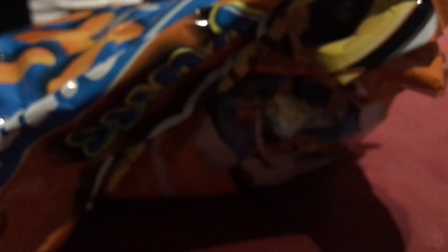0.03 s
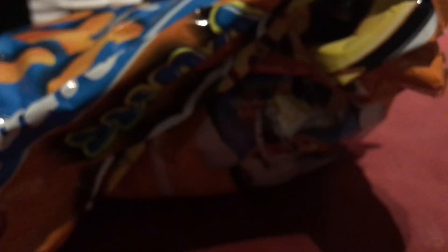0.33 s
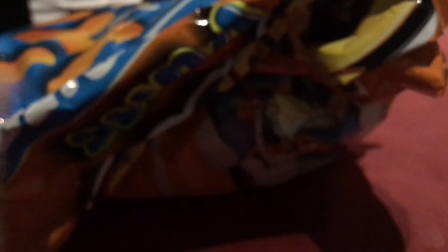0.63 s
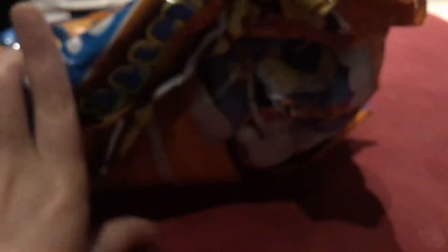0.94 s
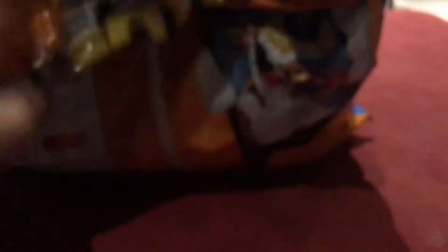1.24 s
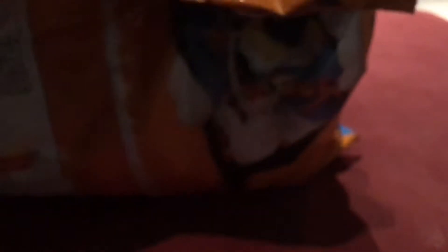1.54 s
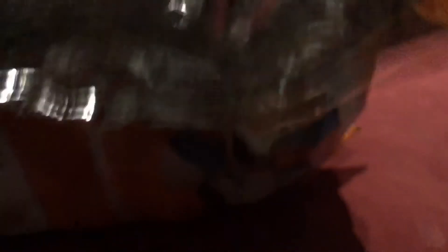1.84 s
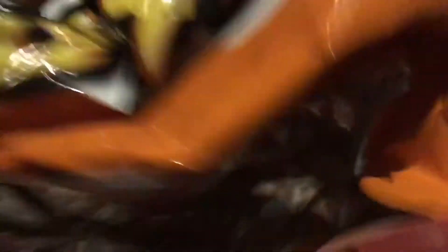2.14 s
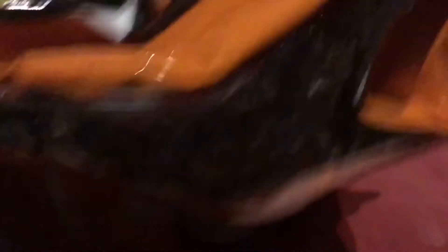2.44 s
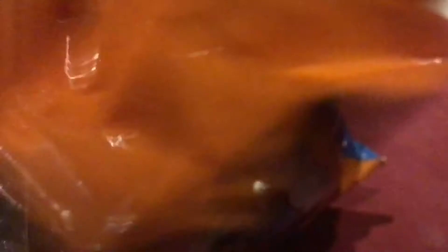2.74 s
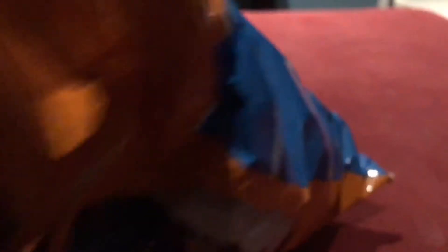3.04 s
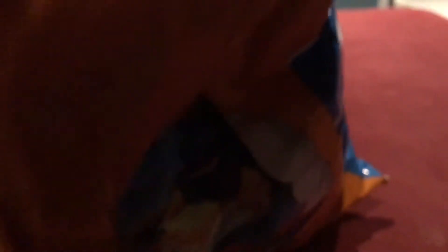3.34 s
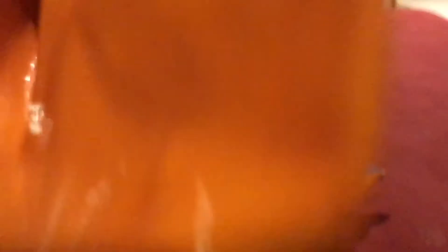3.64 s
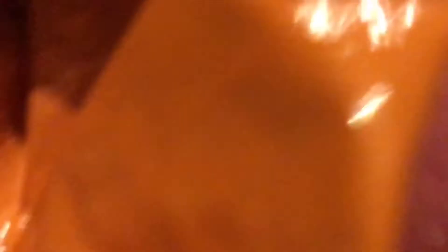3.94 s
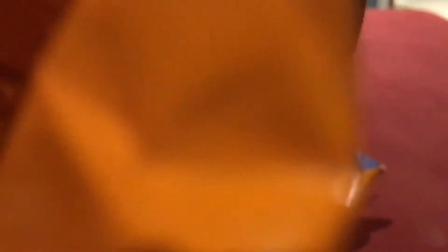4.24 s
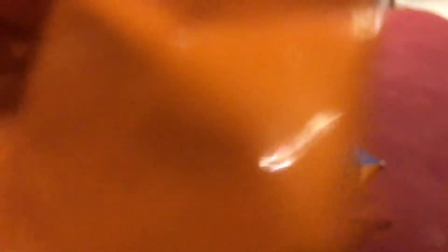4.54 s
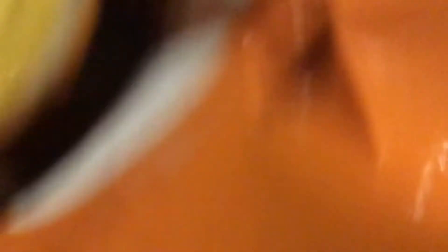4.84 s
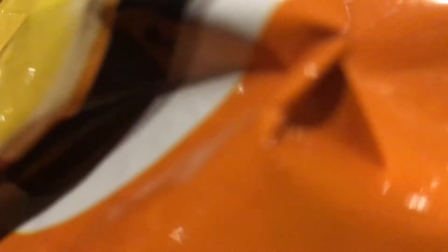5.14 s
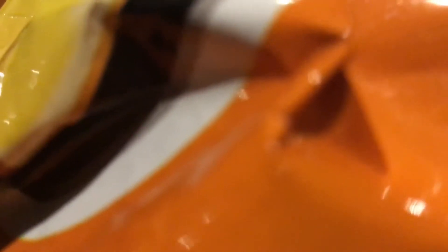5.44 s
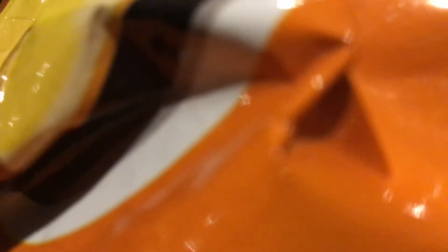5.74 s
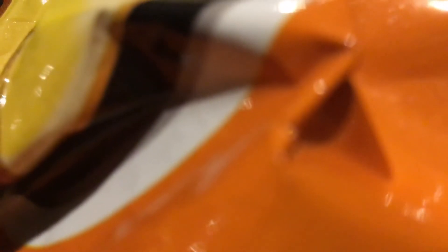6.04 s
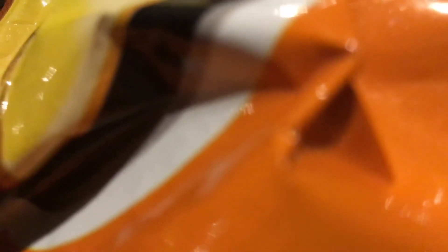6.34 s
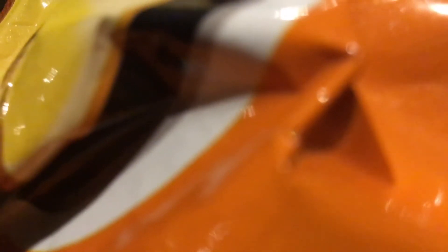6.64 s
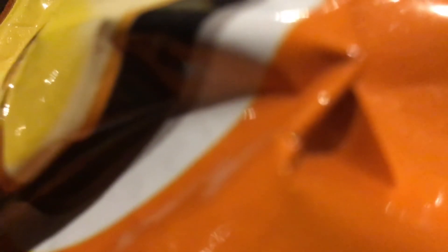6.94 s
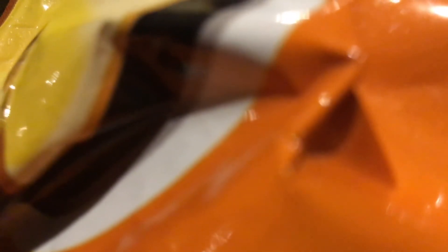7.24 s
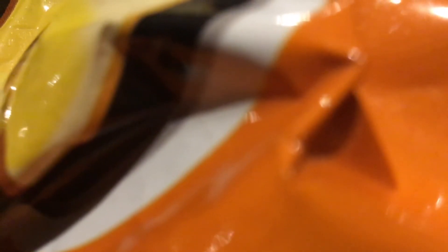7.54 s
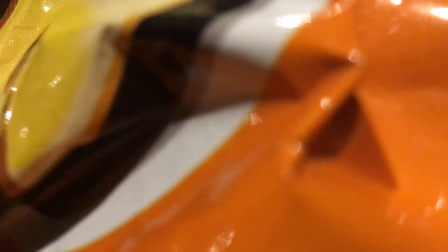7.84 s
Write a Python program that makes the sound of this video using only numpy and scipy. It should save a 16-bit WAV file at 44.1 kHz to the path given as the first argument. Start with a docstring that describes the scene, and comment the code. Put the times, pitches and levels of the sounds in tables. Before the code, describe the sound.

Close, crisp crackling of a plastic snack bag being opened and handled, easing to light rubbing and occasional ticks in a quiet room.

```python
"""A foil snack bag is opened and crumpled on a cloth-covered table, close up in a small quiet room.
After one faint slide of film, the hand takes hold at 0.7 s: creases buckle in sharp snaps over a bed
of tiny crackles, the walls sway, and whole panels flop with soft thumps. From 3.5 s film also drags
over film. Near 5 s the hand comes to rest: the film slides in a few soft strokes and ticks now and
then as it relaxes, over the low hush of the room."""
import sys
import numpy as np
from scipy import signal
from scipy.fft import rfft, irfft
from scipy.io import wavfile
from scipy.ndimage import uniform_filter1d

SR = 44100
rng = np.random.default_rng(int(sys.argv[2]) if len(sys.argv) > 2 else 0)


def to_wav(sig):
    """Store sig (one row per channel, or 1-D mono) as 16-bit WAV at the path in sys.argv[1].

    Samples outside -1..1 are clipped; the rate is SR.
    """
    pcm = np.clip(np.atleast_2d(sig), -1, 1) * 32767
    pcm = np.round(pcm).astype(np.int16)
    wavfile.write(sys.argv[1], SR, pcm.T)  # frames by channels


N = 357210

# The tone of film brushing film. Each row: frequency in Hz, relative level in dB.
RUSTLE_SPECTRUM = [(100, -9.5), (1200, 2), (5500, -5), (11000, -7), (16000, -19.5)]


def snaps(effort, lag_s=.0014, slack_hz=520, busy_db=-40, clean_db=-13, size=2048):
    """Each buckling crease gives a bright crack and a hollow, falling pop from the panel around it."""
    # The big creases. Each row: time in seconds, crack level in dB, nominal crack pitch in Hz,
    # panel level in dB, panel pitch in Hz.
    big_creases = [(0.7173, -46, 5200, -48, 2000), (0.7492, -30.5, 6800, -38, 550),
                   (0.7694, -25, 9200, -21, 2080), (0.8794, -24.5, 6400, -44, 1160),
                   (0.883, -21.5, 10500, -41, 764), (0.9113, -19.5, 8700, -21, 1800),
                   (0.9284, -21, 3220, -15, 2000), (0.95, -20, 4700, -33, 2000),
                   (0.966, -14, 3870, -16.5, 2070), (0.9764, -25, 4500, -40, 1350),
                   (1.026, -15.0, 6360, -19, 1930), (1.1405, -19, 4100, -47, 520),
                   (1.228, -23, 5800, -17.5, 1900), (1.2786, -20.5, 5870, -30, 2000),
                   (1.3491, -23.0, 5000, -26, 1120), (1.3663, -14, 4700, -44.0, 1097),
                   (1.3841, -21, 6600, -24, 2010), (1.419, -24, 3200, -23, 2020),
                   (1.427, -18.5, 5700, -19.5, 1950), (1.462, -17.5, 8400, -21, 2030),
                   (1.4728, -16, 5570, -15.5, 1390), (1.483, -16, 5200, -30.5, 344),
                   (1.518, -29, 4250, -24.5, 1990), (1.5536, -20, 8050, -44, 670),
                   (1.5645, -13, 5540, -32, 475), (1.6314, -14, 5600, -25, 1350),
                   (1.6744, -17.5, 3900, -44, 368), (1.697, -19.5, 7700, -11.5, 2100),
                   (1.7429, -14, 7500, -15, 1560), (1.7524, -14.5, 4200, -33, 1490),
                   (1.7715, -16, 7200, -31, 1730), (1.7974, -10.5, 4630, -21, 1950),
                   (1.8294, -16, 5630, -23.5, 1170), (1.8399, -22, 6200, -25, 1980),
                   (1.8784, -26, 5500, -21.5, 1310), (1.9097, -23.5, 6290, -23.5, 1975),
                   (1.922, -19.5, 4540, -24, 1780), (1.9452, -20.5, 3450, -48.0, 570),
                   (1.9654, -19.5, 6800, -19, 1390), (1.9763, -14, 5460, -30, 755),
                   (2.0072, -16.5, 4420, -27, 586), (2.017, -19.5, 5800, -25.5, 1430),
                   (2.0558, -19, 5040, -18.5, 1900), (2.1129, -13.5, 6000, -21.5, 1150),
                   (2.1784, -20, 4096, -34, 365), (2.1992, -10, 4100, -25, 1400),
                   (2.21, -20, 5330, -15, 1430), (2.2937, -19, 5460, -32, 990),
                   (2.341, -17, 8100, -19.5, 2008), (2.3582, -15.0, 7176, -21, 1980),
                   (2.3764, -15.5, 4700, -31, 530), (2.3931, -18, 4800, -24, 2000),
                   (2.4033, -12, 5000, -22, 870), (2.4833, -16.5, 8110, -21.5, 2000),
                   (2.5, -14.5, 5750, -23, 1550), (2.5537, -10.5, 6200, -27, 594.4),
                   (2.5654, -12, 4770, -13.5, 1370), (2.575, -10, 8900, -21, 1690),
                   (2.623, -17, 4513, -15, 1320), (2.631, -14, 4460, -26, 1250),
                   (2.6402, -13, 5100, -16, 447), (2.6483, -12.5, 3170, -17, 372),
                   (2.6708, -15, 4500, -18, 940), (2.712, -4, 6400, -16, 2044),
                   (2.7312, -13.5, 5970, -10.5, 1992), (2.7747, -10.5, 5377, -19.5, 1075),
                   (2.834, -36, 7900, -12, 1940), (2.8542, -13, 5440, -18, 1090),
                   (2.8881, -18, 5100, -13, 1620), (2.9057, -16.5, 8250, -17, 1360),
                   (2.956, -18, 2977, -52.0, 1080), (3.052, -25, 3794, -25.0, 1010),
                   (3.0657, -46, 10900, -17, 920), (3.0811, -28, 5100, -17, 1670),
                   (3.1113, -18.5, 6100, -20.5, 1360), (3.1257, -18.5, 4800, -24, 1180),
                   (3.1505, -16.5, 3870, -47.0, 1200), (3.1719, -19.5, 3340, -29, 360),
                   (3.1789, -25.5, 8450, -13, 1820), (3.2254, -32, 4910, -21.5, 1330),
                   (3.2777, -46, 3930, -42, 1254), (3.3145, -25.5, 4020, -25, 1020),
                   (3.3376, -17.5, 4970, -23, 1310), (3.376, -18.5, 6490, -13.5, 990),
                   (3.39, -16, 4700, -15.5, 1440), (3.4257, -29, 7100, -43, 1260),
                   (3.448, -15, 6600, -27, 563), (3.4537, -13, 4940, -18, 1080),
                   (3.505, -22, 5000, -31, 775), (3.5219, -14.5, 4870, -30, 1900),
                   (3.5387, -14, 5526, -25, 974), (3.5704, -13.5, 4630, -33, 1300),
                   (3.6054, -18, 5470, -17.5, 1010), (3.628, -21, 4570, -34, 2000),
                   (3.6631, -24.5, 6280, -35, 800), (3.673, -21.5, 3200, -26, 362),
                   (3.6873, -22.5, 4940, -31, 660), (3.7972, -20.5, 4353, -30.5, 516),
                   (3.8157, -27, 4100, -40, 743), (3.8962, -32, 4100, -26.5, 1090),
                   (4.052, -37, 7930, -24, 1270), (4.0667, -26.5, 7590, -23.5, 1966),
                   (4.113, -22, 3900, -32, 378), (4.155, -43, 2410, -27.5, 1270),
                   (4.2127, -20, 4400, -17.5, 722), (4.2721, -19.5, 4295, -17.5, 806),
                   (4.344, -28, 10900, -20, 2000), (4.3502, -16.5, 5470, -15, 1692),
                   (4.3623, -15, 5550, -23.5, 860), (4.3812, -24, 2590, -17.5, 462),
                   (4.4561, -23.5, 3790, -25.5, 1270), (4.4822, -41, 8740, -18.5, 1290),
                   (4.5325, -23.5, 3500, -29.5, 2000), (4.5653, -13.5, 3850, -26, 853),
                   (4.587, -40, 3300, -26.5, 1650), (4.6079, -18.5, 3820, -43, 374),
                   (4.6979, -18.5, 3420, -23.5, 634), (4.742, -17.5, 5730, -28, 1021),
                   (4.7526, -24, 4800, -3.5, 1080), (4.7585, -27, 7000, -30, 1400),
                   (4.787, -6, 11910, -21.5, 1070), (4.7962, -25.5, 8200, -19, 1350),
                   (4.8272, -47, 4200, -27.5, 570), (4.8696, -30.5, 5180, -22, 1200),
                   (4.9028, -58, 3300, -34, 600), (4.9244, -32.5, 4440, -32, 840),
                   (4.934, -39, 6330, -45, 374), (4.9734, -22.5, 6700, -15.5, 529),
                   (4.9826, -31.5, 3100, -20.5, 412), (5.0177, -48, 3300, -36, 510),
                   (5.037, -31.5, 2680, -30.5, 1060), (5.0668, -31.5, 5900, -26.5, 855),
                   (5.0947, -22.5, 7120, -17.5, 923), (5.15, -63.5, 3000, -40, 598),
                   (5.2416, -50, 5000, -35.5, 1150), (5.2544, -43.5, 2400, -26, 367),
                   (5.3214, -22, 3600, -41, 362), (5.3474, -39, 2360, -38.5, 690),
                   (5.4504, -43.5, 5200, -27, 444), (5.5414, -29, 4130, -39, 1890),
                   (5.7818, -24, 5950, -38, 1010), (5.8467, -48, 3700, -26, 440),
                   (5.873, -32, 10820, -42.5, 1560), (6.0481, -71.5, 3900, -43.5, 560),
                   (6.206, -36.5, 4620, -34, 1104), (6.2176, -43.5, 3490, -40.5, 730),
                   (6.2491, -41, 2390, -25.5, 386.4), (6.8842, -28.5, 5300, -43, 1240),
                   (6.944, -42.5, 3500, -23, 557), (6.954, -47, 3600, -25, 439),
                   (6.9854, -42.5, 3200, -27.5, 490), (7.0147, -70, 4800, -36.5, 491),
                   (7.228, -34.5, 3600, -31, 423), (7.3728, -52.0, 2703, -52.5, 1145),
                   (7.6472, -33, 3300, -26, 1500), (7.656, -45.5, 10500, -39, 600)]
    # The tone the film lends every snap. Each row: frequency in Hz, relative level in dB.
    film_spectrum = [(100, 1), (1200, -3.5), (2800, -4), (6000, -2.5), (7700, -3.5), (9500, 1),
                     (11000, 3.5), (11700, -1.5), (12800, 2), (14500, -7), (16000, -3)]
    out, hz, lead_s = np.zeros(N), np.fft.rfftfreq(size, 1 / SR), .006
    film = amp(read(film_spectrum, hz)) * np.exp(-2j * np.pi * hz * lead_s)
    strain = np.clip(effort / amp(busy_db), .4, 1)  # a squeezed crease has stronger side slips
    for s, crack_db, crack_hz, panel_db, panel_hz in list(big_creases) + small_creases(effort):
        busy = strain[int(s * SR)]
        steps = busy * min(amp(clean_db - max(crack_db, panel_db)), 1)  # the biggest go more cleanly
        spread = (2 - busy) * 1000 / panel_hz  # a wide, slack panel draws its wave out longer
        panel_lag_s = lag_s * spread * rng.uniform(.5, 1)
        wave = film * bending_wave(hz, panel_lag_s, scatter_s=0.0004927 * spread, echo=0.65)
        facets = sum(ring(hz, crack_hz * 2 ** rng.uniform(-1, 1), sharpness=15) for _ in range(3))
        crack = hump(hz, crack_hz * 1.105, rise=1.41, fall=3.51) * (1 + 0.9 * facets)
        crack /= np.hypot(1, (hz / (crack_hz * 8 * busy)) ** 4)  # a resting crease has less top end
        crack *= film * bending_wave(hz, lag_s * rng.uniform(.5, 1), scatter_s=.00045, echo=.6)
        crack = irfft(crack * avalanche(hz, spread_s=0.0011, share=0.33 * steps))
        pop = hump(hz, panel_hz * 1.15, rise=0.79, fall=2.03)
        pop = pop * (1 + 0.49 * ring(hz, panel_hz, sharpness=5.5))
        slack = min(slack_hz / panel_hz, 1) ** 2  # the air behind a wide, slack panel rings on, lower
        pop *= 1 + 0.47 * slack * ring(hz, panel_hz * .7, sharpness=7)
        pop *= 1 + .65 * ring(hz, panel_hz * rng.uniform(1.3, 2.4), sharpness=15)  # panel overtone
        pop *= np.exp(-(hz / (9 * panel_hz)) ** 2)  # a whole panel is too heavy for the top end
        pop = irfft(wave * 1j * pop * avalanche(hz, spread_s=0.0022, share=0.42 * steps))
        snap = amp(crack_db) * unit(crack) + amp(panel_db) * unit(pop)
        add(out, s - lead_s, snap * np.sqrt(SR / 1000 / size))  # levels count as rms over 1 ms
    return out


def small_creases(effort, per_s=85, firm_db=-36, spread_db=2.5, spread_octaves=.38):
    """Rows for lesser creases that buckle by chance: denser, louder, brighter as the hand presses."""
    rows = []
    for slot, (when, luck, *chance) in enumerate(rng.random((1000, 6))):
        s = (slot + when) / per_s
        press = effort[int(s * SR)] / amp(firm_db) if s * SR < N else 0
        if luck < press:
            force_db = 0.7 * 20 * np.log10(press)
            crack_force, crack_tune, panel_force, panel_tune = np.sqrt(12) * (np.array(chance) - .5)
            crack_db = -26.5 + force_db + spread_db * crack_force
            crack_hz = 4900 * press ** .12 * 2 ** (spread_octaves * crack_tune)
            panel_db = -34 + force_db + spread_db * panel_force
            panel_hz = 1000 * 2 ** (spread_octaves * panel_tune)
            rows.append((s, crack_db, crack_hz, panel_db, panel_hz))
    return rows


def bending_wave(hz, lag_s, scatter_s, echo, count=6):
    """Spectrum of one kick to the film: treble outruns bass, and nearby folds reflect it."""
    phase = -4 * np.pi * lag_s * (np.sqrt(1000 * hz) - hz / 6)  # speed grows as the root of frequency
    delay = rng.exponential(scatter_s, count)
    strength = echo * rng.standard_normal(count) * np.exp(-delay / (2 * scatter_s))
    folds = 1 + strength @ np.exp(-2j * np.pi * np.outer(delay, hz))
    return folds * np.exp(1j * (phase + 2 * np.pi * rng.random()))


def avalanche(hz, spread_s, share, count=7):
    """Spectrum of a crease giving way in steps: a main slip with smaller ones just before and after."""
    when = np.clip(rng.laplace(spread_s / 4, spread_s, count), -.005, .01)
    return 1 + share * rng.standard_normal(count) @ np.exp(-2j * np.pi * np.outer(when, hz))


def ring(hz, mode_hz, sharpness):
    """One resonance of the bag, gain 1 at its pitch."""
    return 1j * hz * mode_hz / (sharpness * (mode_hz ** 2 - hz ** 2) + 1j * hz * mode_hz)


def hump(hz, centre_hz, rise, fall):
    """A broad band about a centre, with its two slopes as powers of frequency."""
    ratio = hz / centre_hz
    return ratio ** rise / (1 + ratio ** (rise + fall))


def handling(attack_s=.022, build_db=2, release_db_per_s=448.5):
    """Effort and sway envelopes: each squeeze takes hold, builds as the film tightens, and lets go."""
    # Long light grips and short squeezes. Each row: start in seconds, length in seconds,
    # effort in dB, wall sway in dB.
    squeezes = [(0.708, 0.13, -49.5, -53), (0.862, 2.22, -45, -47.5), (3.279, 1.605, -55, -47.5),
                (0.749, 0.034, -47.5, -36), (0.905, 0.14, -40, -52), (1.094, 0.2, -37, -41.5),
                (1.387, 0.12, -42.5, -45), (1.601, 0.25, -36, -40.5), (1.641, 0.019, -32.5, -46.5),
                (2.137, 0.067, -34, -32.5), (2.189, 0.026, -30.5, -38.5), (2.285, 0.13, -38.5, -40.5),
                (2.469, 0.24, -35, -33), (2.705, 0.2, -28, -28), (3.025, 0.16, -37, -33),
                (3.307, 0.11, -39, -32), (3.48, 0.057, -31.5, -28.5), (3.561, 0.12, -42, -33.5),
                (3.698, 0.21, -46, -39), (4.043, 0.097, -44, -37.5), (4.31, 0.15, -44, -34),
                (4.503, 0.22, -50, -39.5), (4.677, 0.088, -41, -30.5)]
    t, power = np.arange(N) / SR, np.zeros((2, N))
    for start, length, effort_db, sway_db in squeezes:
        first = round(start * SR)
        age = t[first:first + round(length * SR) + SR // 2] - start
        build = build_db * (np.minimum(age / length, 1) - .5)
        release = release_db_per_s * np.maximum(age - length, 0)
        shape = np.clip(age / attack_s, 0, 1) * amp(build - release)
        add(power[0], start, (amp(effort_db) * shape) ** 2)
        add(power[1], start, (amp(sway_db) * shape) ** 2)
    return np.sqrt(power)


def crackle(effort, wrinkle_db=-0.97, foil_db=-9, rustle_db=-10, firm_db=-54, limp_db_per_s=7):
    """Small wrinkles give way all over the bag and the foil ticks sharply, above a soft rustle."""
    # The tones of the wrinkles and the foil ticks. Each row: frequency in Hz, relative level in dB.
    wrinkle_spectrum = [(100, -11.5), (300, -0.5), (550, 0.5), (1200, 4), (5500, -4), (7700, -7),
                        (11000, -3.5), (12600, -13), (16000, -16)]
    foil_spectrum = [(1000, -17.5), (7500, -2.5), (10000, 0.5), (16000, -9)]
    wrinkles = steadied(colour(grains(per_s=450, spread_db=7.5), wrinkle_spectrum), window_s=0.094)
    rustle = rough_noise(RUSTLE_SPECTRUM, depth_db=5, per_s=160)
    ticks = steadied(colour(grains(per_s=65, spread_db=8.5), foil_spectrum), window_s=.12)
    bright = amp(wrinkle_db) * wrinkles + amp(foil_db) * ticks + amp(rustle_db) * rustle
    dull = signal.sosfiltfilt(signal.butter(2, 8000, fs=SR, output="sos"), bright)
    # Creased film goes limp and needs an ever firmer touch to crackle brightly.
    firm = np.minimum(effort / amp(firm_db + limp_db_per_s * np.arange(N) / SR), 1)
    return effort * (firm * bright + (1 - firm) * dull)


def grains(per_s, spread_db, facet_gain=2.2, count=48, size=1024):
    """A swarm of tiny buckles of uneven size and brightness, on facets of many pitches."""
    hz, out = np.fft.rfftfreq(size, 1 / SR), np.zeros(N)
    lead = np.exp(-2j * np.pi * hz * .006)  # 6 ms of room for the early slips
    for centre_hz in np.geomspace(1100, 10000, count):
        wave = lead * bending_wave(hz, lag_s=.0012 * rng.random(), scatter_s=0.00093, echo=0.39)
        wave *= avalanche(hz, spread_s=.0009, share=0.29)
        wave *= 1 + facet_gain * ring(hz, centre_hz, sharpness=8.1)
        grain = unit(irfft(wave * hump(hz, centre_hz, rise=0.67, fall=0.83)))
        for when, rarity in rng.random((size, 2))[:round(per_s * N / SR / count)]:
            boost_db = spread_db * min(-np.log(rarity), 3)  # large ones are rare
            add(out, when * N / SR, grain * amp(boost_db))
    return out


def thumps(trim_db=1, swell_s=0.0024):
    """A whole panel flops over and pushes air, its pitch dropping as it slackens."""
    # The panel flops. Each row: start in seconds, level in dB, nominal pitch in Hz.
    flops = [(0.772, -30, 140), (0.978, -29, 105), (1.748, -26, 131.8), (2.234, -26, 70), (2.562, -20, 205),
             (2.647, -24.5, 240), (2.772, -19, 177), (2.861, -16, 194.9), (3.128, -27, 119),
             (3.394, -19, 95), (3.448, -11, 116), (3.474, -21, 79.7), (4.212, -24.5, 191.3),
             (4.386, -23, 159), (4.712, -25, 171), (4.983, -21.5, 207)]
    out, t = np.zeros(N), np.arange(SR // 12) / SR
    push = t / swell_s * np.exp(1 - t / swell_s)
    for s, db, hz in flops:
        turns = np.cumsum(hz * (.7 + .7 * np.exp(-t / 0.0056))) / SR
        add(out, s, amp(db + trim_db) * push * np.sin(2 * np.pi * turns))
    return out


def walls(sway, trim_db=-1):
    """The bag's walls sway in low lumps under the hand."""
    # The bass-heavy tone of the walls. Each row: frequency in Hz, relative level in dB.
    sway_spectrum = [(25, -41), (45, -12), (70, 0.5), (120, -4.5), (190, -1.5), (330, -8), (550, -19),
                     (1200, -32), (7000, -44), (11000, -36.5), (16000, -57.5)]
    lumps = rough_noise(sway_spectrum, depth_db=4, per_s=45)
    return amp(trim_db) * sway * steadied(lumps, window_s=0.13)


def slide(jerks_per_s=29, quickening=20, drift=.028, grain_db=3.5, fade_share=0.22, firm_db=-52):
    """Film slides in quickening stick-slip jerks, each ringing it at slightly different pitches."""
    # Strokes under the hand. Each row: start in seconds, length in seconds, level in dB,
    # stutter depth in dB, pitch of the hollow in Hz.
    strokes = [(0.037, 0.12, -71, 6.5, 2000), (5.349, 0.25, -56.5, 7, 1450), (5.574, 0.14, -56, 6.5, 1500),
               (5.693, 0.069, -49.5, 5, 1390), (5.751, 0.17, -52.5, 4.5, 1830),
               (6.305, 0.19, -63, 0.5, 1910), (6.708, 0.27, -68.5, 2, 1934)]
    # The tone of the friction hiss. Each row: frequency in Hz, relative level in dB.
    rub_spectrum = [(400, -11), (900, -2), (1400, 4), (2000, -5), (2500, -2.5), (5000, -4.5), (7300, -5),
                    (9000, -5), (11300, -0.5), (12600, -5.5), (16000, -9)]
    # The rubbed film's resonances. Each row: pitch in Hz, gain over the hiss.
    film_modes = [(2000, 0.74), (4280, 1.4), (5940, 2.3), (8400, 1.3), (9390, 1.7), (11000, 1.7)]
    out, hz = np.zeros(N), np.fft.rfftfreq(SR // 2, 1 / SR)
    for start, length, db, stutter_db, hollow_hz in strokes:
        t = np.arange(round(length * SR)) / SR
        stroke = np.zeros(len(t))
        noise, shifts = rng.standard_normal(SR // 2), rng.standard_normal((40, 3))
        top_hz = 16000 * amp(db - firm_db) ** 0.55  # a light stroke is duller
        hiss = amp(read(rub_spectrum, hz)) / (1 + (hz / top_hz) ** 6) ** .5
        turns = jerks_per_s * t + quickening * t ** 2
        grip_db = grain_db * wander(450)[:len(t)] - stutter_db * np.cos(2 * np.pi * turns)
        rub = noise[:len(t)] * amp(grip_db)
        for jerk, (force, hollow_tune, film_tune) in enumerate(shifts[:int(turns[-1]) + 1]):
            climb = 0.11 * (jerk / turns[-1] - .5)  # the hollow rises along the stroke
            body = 2.5 * ring(hz, hollow_hz * (1 + climb + drift * hollow_tune), sharpness=8)
            for mode_hz, gain in film_modes:
                body += gain * ring(hz, mode_hz * (1 + drift * film_tune), sharpness=26)
            slip = rfft(rub * (turns.astype(int) == jerk), SR // 2)
            stroke += amp(stutter_db * force / 5) * irfft(slip * hiss * (1 + body))[:len(t)]
        fade = np.minimum(np.minimum(t, length - t) / (fade_share * length), 1)
        add(out, start, amp(db) * unit(stroke * fade))
    return out


def drag():
    """Late in the handling, film drags over film between the snaps, catching and freeing."""
    # The fader curve of the drag. Each row: time in seconds, level in dB.
    drag_curve = [(3.55, -57), (3.7, -52), (4.0, -66), (4.15, -57.5), (4.68, -55), (4.84, -70.5)]
    s, db = np.transpose(drag_curve)
    fader = amp(np.interp(np.arange(N) / SR, s, db, left=-120, right=-120))
    return fader * rough_noise(RUSTLE_SPECTRUM, depth_db=6, per_s=90)


def room(x, near_db=-22.0, tail_db=-23, count=10):
    """Adds a few quick reflections from the table and the bag itself, then a short faint tail."""
    # The room's decay. Each row: frequency in Hz, seconds to fall by 60 dB.
    decay_times = [(200, 0.31), (5000, 0.05), (14000, 0.085)]
    near = np.zeros(SR // 50)
    near[rng.integers(SR // 600, SR // 70, count)] = rng.standard_normal(count)
    hz, t, bands = signal.stft(rng.standard_normal(SR // 2), SR, nperseg=256)
    decay = amp(-60 * t / read(decay_times, hz)[:, None])
    tail = signal.istft(bands * decay, SR, nperseg=256)[1]
    echo = amp(tail_db) * tail / np.linalg.norm(tail)
    add(echo, 0, amp(near_db) * near / np.linalg.norm(near))
    return x + signal.oaconvolve(x, echo)[:N]


def hush(level_db=-53, waver_db=1):
    """The low, slightly wavering background of the room."""
    # The room tone. Each row: frequency in Hz, relative level in dB.
    hush_spectrum = [(25, -35), (55, -11), (117, -3), (160, -10.5), (220, -17.5), (263, -9), (295, -18),
                     (545, -30.5), (1000, -35), (3000, -47.5), (11500, -56), (13000, -66), (16000, -75)]
    return amp(level_db + waver_db * wander(7.3)) * colour(rng.standard_normal(N), hush_spectrum)


def amp(db):
    """Decibels to gain."""
    return 10 ** (np.asarray(db) / 20)


def unit(x):
    """Scales to rms 1."""
    return x / np.sqrt(np.mean(x ** 2) + 1e-20)


def read(points, hz):
    """Reads a curve on a log-frequency axis."""
    f, value = np.transpose(points)
    return np.interp(np.log(hz + 1), np.log(f + 1), value)


def add(mix, s, sound):
    """Mixes a sound in at time s."""
    part = mix[max(round(s * SR), 0):][:len(sound)]
    part += sound[:len(part)]


def colour(x, spectrum):
    """Equalises a full-length signal with a spectrum, at rms 1."""
    return unit(irfft(rfft(x) * amp(read(spectrum, np.fft.rfftfreq(N, 1 / SR))), N))


def wander(per_s):
    """Smooth random motion of rms 1 that swings up to per_s times a second."""
    hz = np.fft.rfftfreq(N, 1 / SR)
    return unit(irfft(rfft(rng.standard_normal(N)) * (hz < per_s), N))


def rough_noise(spectrum, depth_db, per_s):
    """Coloured noise whose level flutters at random."""
    return colour(rng.standard_normal(N) * amp(depth_db * wander(per_s)), spectrum)


def steadied(x, window_s):
    """Evens out the slow swells of a texture and keeps its spikes."""
    return x / np.sqrt(abs(uniform_filter1d(x ** 2, int(window_s * SR))) + 1e-6)


def scene():
    """The handled bag in its room, in mono."""
    effort, sway = handling()
    background = hush()
    bag = crackle(effort) + drag() + walls(sway) + thumps() + slide() + snaps(effort)
    return (room(bag) + background)[None]


def record(dry, low_cut_hz=36, ceiling=.92, high_cut_hz=16100):
    """The microphone drops the deepest bass, peaks over the ceiling clip, and the very top is cut."""
    thinned = signal.sosfilt(signal.butter(4, low_cut_hz, "highpass", fs=SR, output="sos"), dry)
    high_cut = signal.firwin(255, high_cut_hz, window=("kaiser", 8), fs=SR)
    return signal.oaconvolve(np.clip(thinned, -ceiling, ceiling), high_cut[None], "same")


dry = scene()
out = record(dry)
to_wav(out)
```